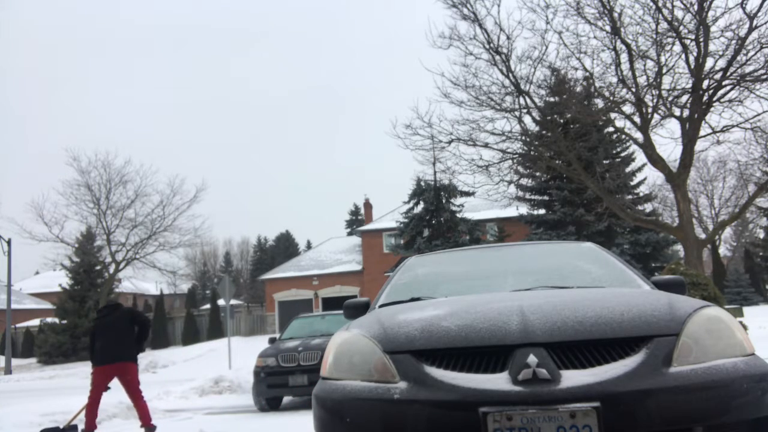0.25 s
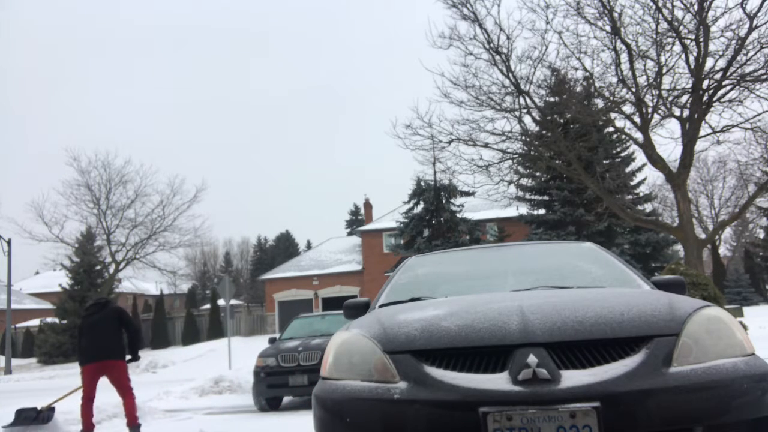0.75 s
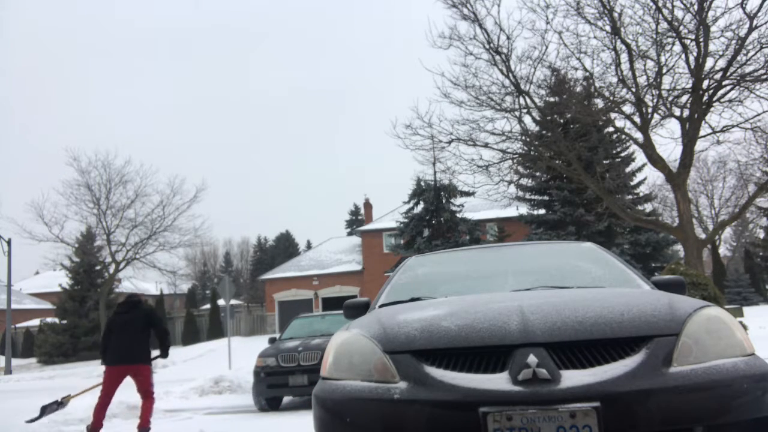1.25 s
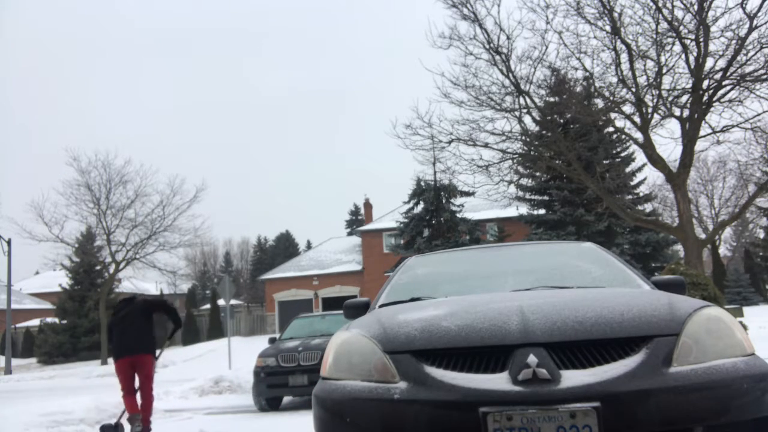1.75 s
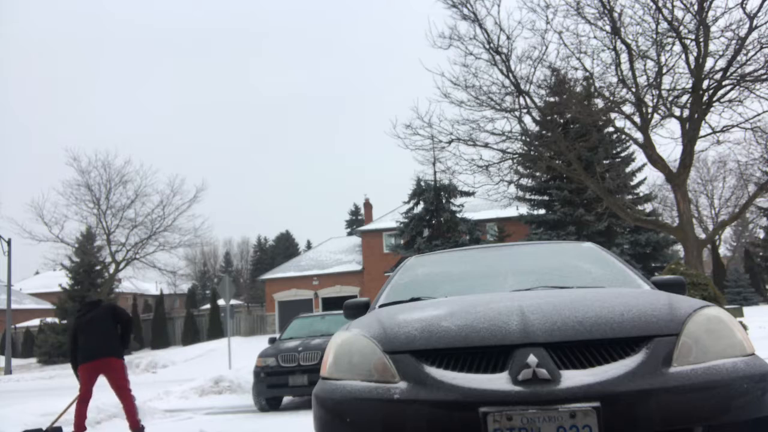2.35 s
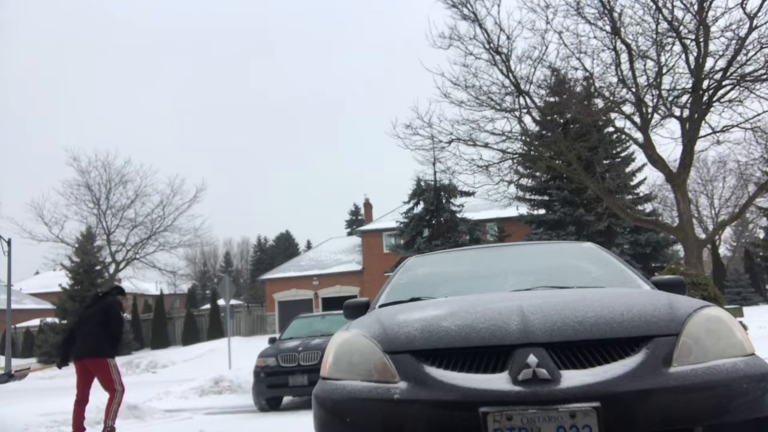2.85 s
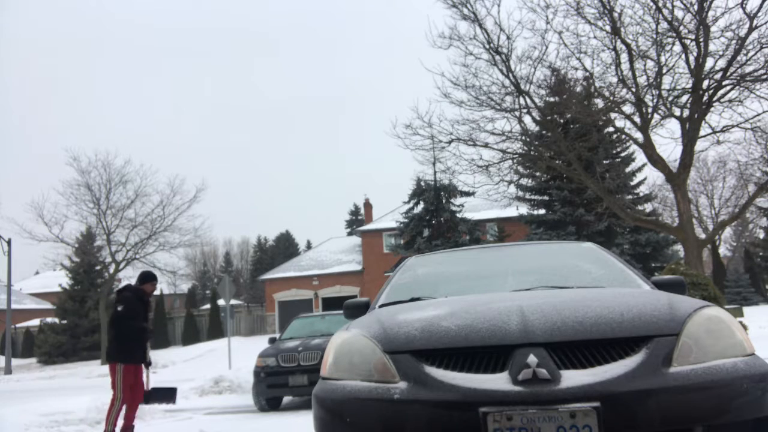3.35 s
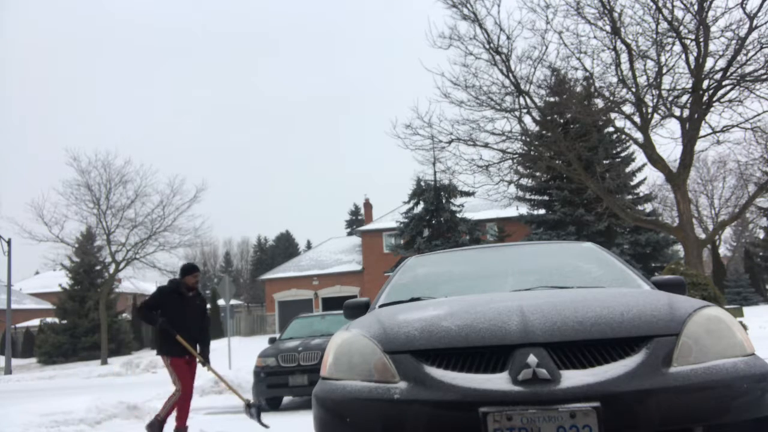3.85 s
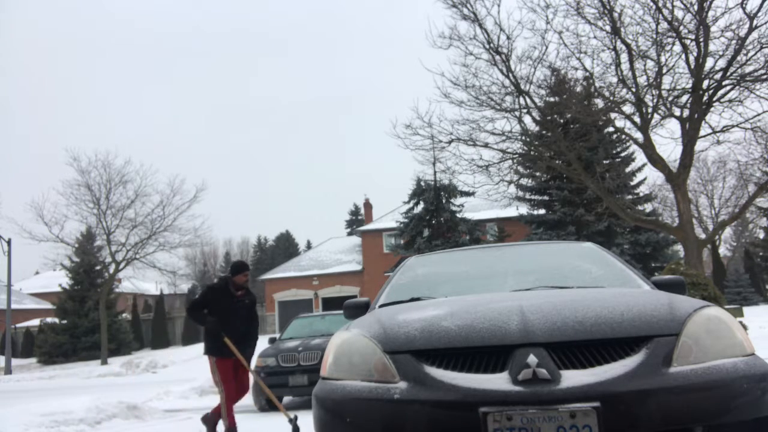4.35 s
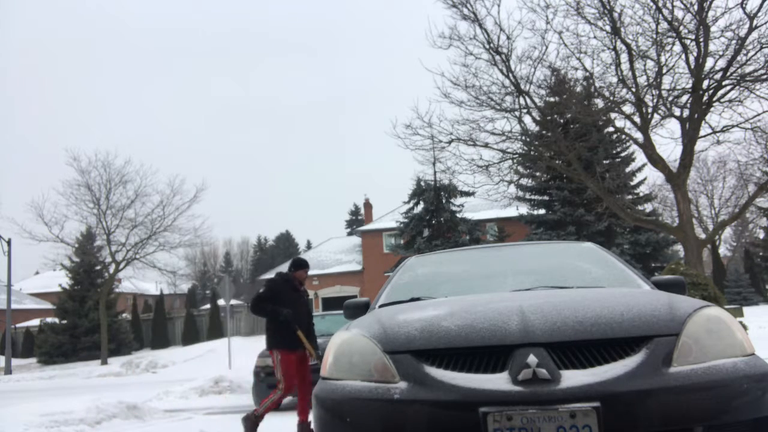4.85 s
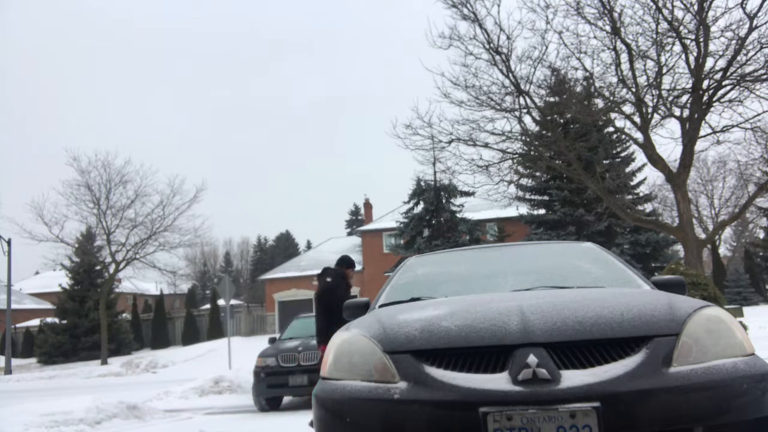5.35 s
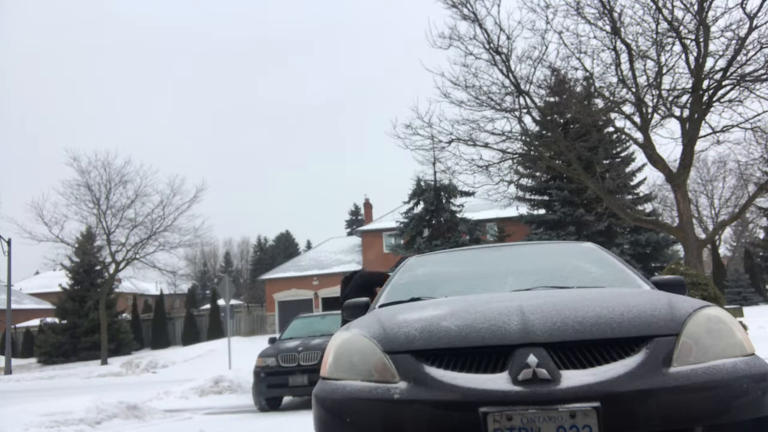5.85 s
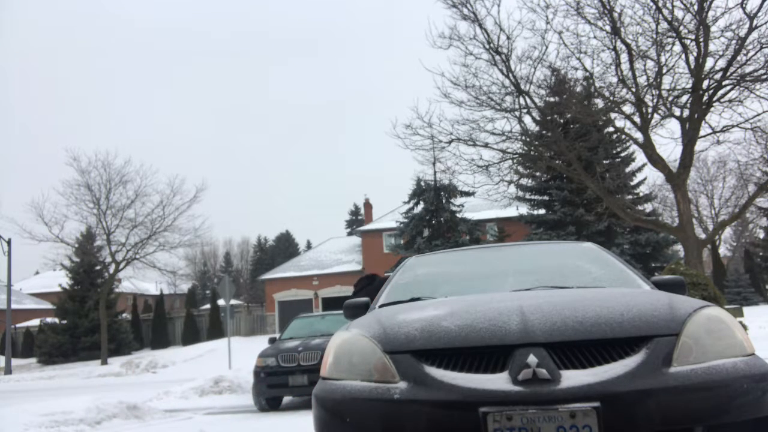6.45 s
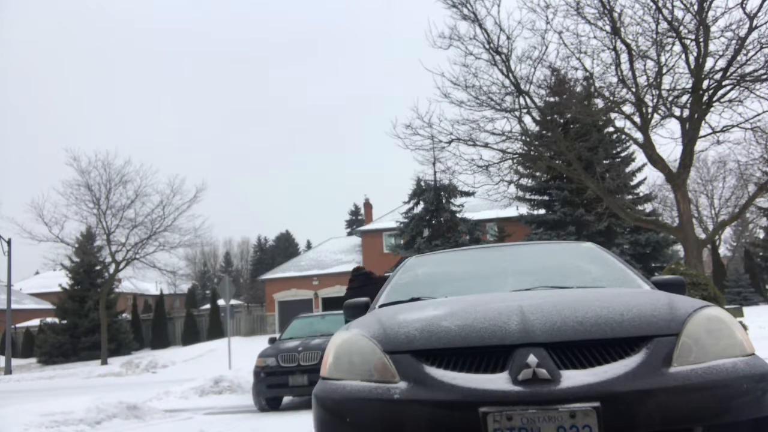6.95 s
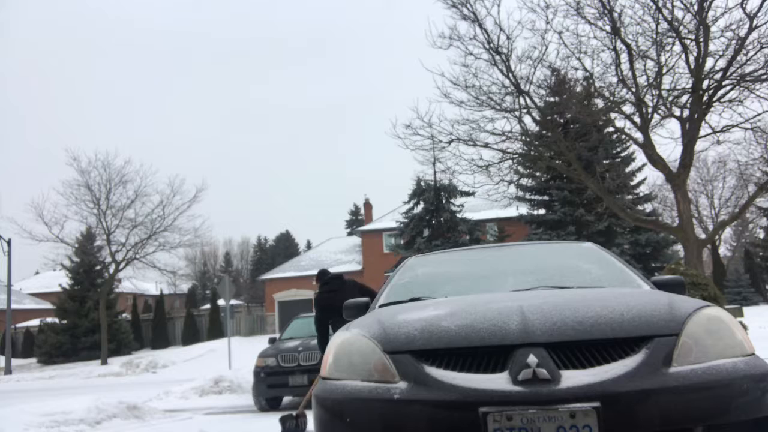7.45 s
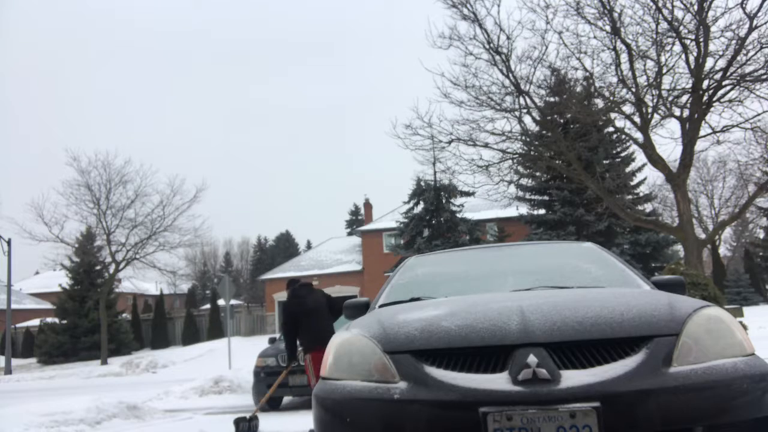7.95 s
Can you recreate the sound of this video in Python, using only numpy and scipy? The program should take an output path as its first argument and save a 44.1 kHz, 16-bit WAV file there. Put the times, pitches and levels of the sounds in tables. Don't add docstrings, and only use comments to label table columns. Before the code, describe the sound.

Someone shovels icy snow outdoors: a short scrape and woody knock, a second push and knock, then longer crunching drags with uneven catches.

```python
import sys
import numpy as np
from scipy import signal
from scipy.fft import rfft, irfft, next_fast_len
from scipy.io import wavfile
from scipy.ndimage import uniform_filter1d

SR = 44100
rng = np.random.default_rng(int(sys.argv[2]) if len(sys.argv) > 2 else 0)


def gain_from_decibels(decibels):
    exponent = np.asarray(decibels, float) / 20
    return 10 ** exponent


def generate_wav(signal):
    frames = np.transpose(np.atleast_2d(signal))
    scaled = np.clip(frames, -1, 1) * 32767
    pcm = np.round(scaled).astype(np.int16)
    wavfile.write(sys.argv[1], SR, pcm)


N = 362502


def read(points, hz):
    f, value = np.transpose(points)
    return np.interp(np.log(hz + 1), np.log(f + 1), value)


def evened(x):
    return x / np.sqrt(np.mean(x ** 2) + 1e-20)


def add(mix, s, sound):
    part = mix[max(round(s * SR), 0):][:len(sound)]
    part += sound[:len(part)]


def lifted(hz, modes):
    return gain_from_decibels(sum(db / (1 + (2 * (hz - f) / max(width, 65)) ** 2) for f, width, db in modes))


def band(x, centre_hz, octaves, modes=()):
    size = next_fast_len(len(x) + 2048)
    hz = np.fft.rfftfreq(size, 1 / SR)
    bell = np.exp(-.5 * (np.log2((hz + 1) / centre_hz) / octaves) ** 2)
    shaped = irfft(rfft(x, size) * bell * lifted(hz, modes), size)
    return evened(shaped[:len(x)])


def grit(size, spread_db, bumps_db, bump_ms):
    cracks = (rng.random(size) < 11000 / SR) * rng.standard_normal(size)
    cracks = cracks * gain_from_decibels(spread_db * np.minimum(rng.exponential(1, size), 4))
    hold = np.exp(-1000 / (bump_ms * SR))
    hits = (rng.random(size) < 110 / SR) * rng.exponential(1, size)
    bumps = signal.lfilter([1], [1, -hold], hits)
    return cracks * gain_from_decibels(bumps_db * uniform_filter1d(evened(bumps - bumps.mean()), 60))


def wandering(x, depth_db):
    z = signal.stft(x, nperseg=512, noverlap=384)[2]
    patches = uniform_filter1d(rng.standard_normal(z.shape), size=2, axis=0)
    patches = uniform_filter1d(patches, size=12, axis=1)
    return signal.istft(z * gain_from_decibels(depth_db * evened(patches)), nperseg=512, noverlap=384)[1][:len(x)]


def curve(rows):
    s, db = np.transpose(rows)
    t = np.arange(s[0], s[-1], 1 / SR)
    return t, np.interp(t, s, db)


def arch(s, rise_s, fall_s, db, lead=1.4):
    t = np.arange(-lead * rise_s, 1.4 * fall_s, 1 / SR)
    return s + t, db - 20 * (t / np.where(t < 0, rise_s, fall_s)) ** 2


def soft_ends(t):
    return np.clip(np.minimum(t - t[0] + (t[0] == 0), t[-1] - t) / 0.00078, 0, 1)


# frequency in Hz, density in dB per Hz.
STREET_SPECTRUM = [(15, -55), (25, 0.5), (80, -7.5), (240, -12.5), (370, -19.5), (700, -25), (2700, -38),
                   (15600, -48.5)]


def street():
    frames, hz = N // 512 + 5, np.fft.rfftfreq(2048, 1 / SR)
    real, imag, patches = rng.standard_normal((frames, 1025, 3)).T
    patches = evened(uniform_filter1d(uniform_filter1d(patches, 20, 0), 10, 1))
    z = (real + 1j * imag) * gain_from_decibels(read(STREET_SPECTRUM, hz)[:, None] + 1.1 * patches)
    return gain_from_decibels(-56.5) * evened(signal.istft(z, nperseg=2048, noverlap=1536)[1][:N])


# delay in ms, level in dB.
ECHOES = [(14, -18.5), (42, -28.5), (68, -34.5), (84, -28.5)]
# frequency in Hz, t60 in seconds.
YARD_DECAY = [(150, 0.9), (400, 0.45), (1000, 0.52), (2500, 0.25), (8000, 0.4)]


def yard(x):
    taps = np.zeros(SR // 2)
    at = np.arange(400, len(taps) - 20, 20)
    taps[at + rng.integers(0, 20, len(at))] = rng.choice([-1., 1.], len(at))
    hz, t, z = signal.stft(taps, SR, nperseg=256)
    tail = signal.istft(z * gain_from_decibels(-60 * t / read(YARD_DECAY, hz)[:, None]), SR, nperseg=256)[1]
    tail = gain_from_decibels(-13) * tail / np.linalg.norm(tail)
    for ms, db in ECHOES:
        smear = rng.standard_normal(300) * np.hanning(300) / 11
        add(tail, ms / 1000, gain_from_decibels(db) * smear)
    return signal.oaconvolve(x, tail)[:N]


# start in seconds, peak in dB, pitch in Hz.
TICKS = [(0.131, -46, 3200), (.7003, -52, 1540), (0.919, -55, 4500), (2.468, -39, 2240), (2.494, -46, 1640),
         (2.524, -48, 1870), (2.578, -43, 2420), (2.72, -54, 5000), (2.6658, -48, 1570), (3.689, -53, 2510),
         (3.8272, -54, 1610)]


def tick(s, db, hz):
    t = np.arange(900) / SR
    snap = band(rng.standard_normal(len(t)), 1.1 * hz, 0.73)
    return s, gain_from_decibels(db - 7.5) * snap * gain_from_decibels(-60 * t / 0.028) * np.clip(t / 0.0012, 0, 1)


# densest moment, rise and fall in seconds, rustle in dB.
SWISHES = [
    (.075, 0.018, 0.023, -54),
    (.114, 0.043, 0.083, -74.5),
    (.72, .22, 0.19, -71.5),
    (1.18, .13, 0.071, -62),
    (1.001, .6, 0.49, -75),
    (2.414, 0.032, 0.03, -49.5),
    (2.529, .15, 0.17, -69.5),
    (2.68, .16, .16, -70),
    (2.945, .1, 0.073, -61),
    (3.69, 0.16, 0.18, -65),
]
# lower edge in Hz, then low shuffle, fizz and bounce off the car body in dB.
SWISH_COLOUR = [(590, -3, -12, -28), (590, 20.5, -7, -14), (550, 2.5, 3.5, -36), (1800, 2, -7, -34),
                (600, 9.5, -5, -25), (770, 3, -8, -27), (770, 12, -8, -28), (770, 0, 1, -28),
                (1000, -10, -4.5, -25), (1100, -3, -13, -5)]


def swish(row, colour):
    t, rustle_db = arch(*row)
    edge_hz, low_db, fizz_db, bounce_db = colour
    drive = wandering(grit(len(t), spread_db=-1.5, bumps_db=-0.6, bump_ms=12), depth_db=1.5)
    drive = drive + gain_from_decibels(bounce_db) * np.roll(drive, round(.894 * SR / 1000))
    rustle = signal.sosfilt(signal.butter(4, edge_hz, "high", fs=SR, output="sos"), drive)
    fizz_db = fizz_db + rustle_db - row[-1]
    cloud = band(rustle, 3050, 0.69) + gain_from_decibels(low_db) * band(drive, 790, 0.84)
    cloud = cloud + gain_from_decibels(fizz_db) * band(drive, 11600, 0.67)
    return t[0], gain_from_decibels(rustle_db) * cloud * soft_ends(t)


# start in seconds, peak in dB.
KNOCKS = [
    [(.0782, -13.5), (.0885, -26)],
    [(2.4038, -16)],
    [(.106, -36), (1.162, -44.5), (1.2, -45), (1.215, -46.5), (2.445, -41), (2.47, -37.5), (2.583, -37.5),
     (5.372, -51), (5.43, -45), (5.829, -42)],
    [(4.7, -41.5), (2.3, -50)],
]
# frequency in Hz, level in dB, t60 in seconds.
KNOCK_MODES = [
    [(160, 1, 0.064), (250, 9, 0.033), (312, 14, 0.017), (744, 3, 0.014), (875, 0.5, 0.02),
     (1143, -6.5, 0.032)],
    [(157, 0, 0.037), (388, 8, 0.026), (496, -9.5, 0.078), (628, -4.5, 0.029), (711, -6, 0.037),
     (818, -11, 0.16), (1090, -16, 0.026)],
    [(253, -1.5, 0.031), (472, 10.5, 0.0057), (720, -10, 0.12)],
    [(105, -3, .09), (147, -7, 0.17)],
]
BLOW_MS = [.16, .17, .4, .9]


def knock(s, db, modes, blow_ms):
    t = np.arange(6000) / SR
    ring = np.zeros(len(t))
    for hz, level_db, t60 in modes:
        build_up = 1 - np.exp(-1.6 * hz * t)
        ring += gain_from_decibels(level_db - 60 * t / min(t60, .055)) * build_up * np.sin(2 * np.pi * hz * t)
    u = np.arange(-4, 8, 1000 / (blow_ms * SR))
    push = np.exp(-.5 * (u - 3) ** 2) - 0.26 * np.exp(-.5 * u ** 2)
    ring = np.diff(signal.oaconvolve(ring, push)[:len(t)], prepend=0)
    return s - .005 * blow_ms, gain_from_decibels(db) * ring / abs(ring).max()


# frequency in Hz, width in Hz, lift in dB.
HUM = [(260, 65, 2), (335, 65, 7), (385, 65, 6)]
# start in seconds, peak in dB, pitch in Hz,
# low thump and spray in dB relative to the burst.
CATCHES = [(1.834, -37, 600, -13, 1.5), (1.965, -33, 1460, -31, -2), (2.028, -38, 1080, -19, -16),
           (2.105, -27, 1300, -31, -18), (4.497, -41, 1930, -23, -20), (4.748, -38, 744, -21, 0),
           (5.247, -34, 1000, -30, -24), (5.328, -39, 1100, 0, -15), (5.36, -35.5, 1100, -0.5, -8),
           (5.825, -43.5, 1660, 7, -22), (6.08, -39.5, 760, 2, -23), (6.324, -34.5, 1100, -2, -30),
           (6.379, -35, 1030, -6, -28), (7.272, -54, 1300, -23, -12), (7.377, -40, 3600, -23, 2),
           (7.385, -32.5, 1950, 0, -23), (7.437, -36, 1210, -2, -2), (7.495, -33, 1500, -23, -6),
           (7.557, -31, 1280, -14, -3), (7.692, -30, 1290, -11, -8), (7.834, -38, 1800, -20, -19),
           (7.912, -35.5, 2570, -18, -16), (8.029, -33, 1790, -33, -11), (8.086, -38, 2700, -13, -11)]


def catch(s, db, hz, thump_db, spray_db):
    t = np.arange(2600) / SR
    noise = rng.standard_normal(len(t))
    burst = band(noise, hz, 0.87)
    burst = burst + gain_from_decibels(thump_db + 3) * band(noise, 310, 0.45, HUM)
    burst = burst + gain_from_decibels(spray_db - 0.5) * band(noise, 3300, 0.68)
    burst = burst + gain_from_decibels(spray_db - 11.0) * band(noise, 14000, 0.28)
    return s, gain_from_decibels(db - 11.5) * burst * gain_from_decibels(-60 * t / 0.12) * np.clip(t / 0.0016, 0, 1)


# frequency in Hz, width in Hz, lift in dB.
BLADE = [
    [(835, 89, 8), (1130, 100, 1), (1500, 57, 13)],
    [(507, 72, 7.5), (1080, 70, 9.5), (1460, 36, 6.5), (2220, 310, 5)],
    [(1180, 130, 5), (1960, 130, 8), (2690, 130, 0)],
    [(750, 61, 4.5), (1062, 71, 7), (1480, 50, 4.5), (1710, 190, 7), (2200, 150, 3)],
    [(705, 160, 5.5), (1080, 82, 6), (1640, 150, 7.5)],
    [(774, 71, 6), (1050, 100, 6.5), (1540, 67, 8)],
    [(780, 21, 6.5), (1120, 30, 6), (1460, 48, 8.5), (1960, 180, 5.5), (3880, 950, 3.5)],
]
# time in seconds, grind in dB.
PUSHES = [
    [(0.0, -50), (0.012, -45), (0.07, -46.5)],
    [(1.832, -66), (1.84, -41), (1.872, -48.5), (1.89, -43.5), (2.094, -39), (2.102, -42), (2.138, -40.5),
     (2.396, -48.5)],
    [(7.222, -53.5), (7.316, -44.5), (7.402, -43.5), (7.48, -49), (7.498, -44), (7.766, -49), (7.79, -49),
     (8.188, -48.5), (8.22, -49)],
]
# time in seconds, grind in dB.
DRAGS = [
    [(4.495, -58), (4.503, -49.5), (4.897, -45), (4.923, -47.5), (5.027, -43.5), (5.187, -50.5), (5.2, -45)],
    [(5.2, -46.5), (5.294, -51.5), (5.372, -50.5), (5.536, -60), (5.542, -55), (5.764, -62.5), (5.8, -53)],
    [(5.8, -56), (5.816, -56), (5.824, -52.5), (5.964, -47.5), (6.242, -58.5), (6.25, -49)],
    [(6.25, -49), (6.32, -51), (6.326, -50), (6.344, -52), (6.378, -50), (6.464, -50), (6.582, -45),
     (6.736, -49), (6.95, -74)],
]
# hardest moment, lead-in and fall in seconds, grind in dB.
SKIPS = [
    (4.425, 0.064, 0.051, -48.5),
    (7.154, .022, .015, -45),
    (7.188, .014, .025, -47.5),
]
# time in seconds, screen in dB, load in dB.
SHOVEL = [(0, 9, -7), (1.83, -2.5, -25), (2.25, -0.5, -11.5), (2.39, 3, -12), (4.36, 1.5, -22),
          (4.85, 3, -11.5), (5.0, 11.5, -11.5), (5.3, 13.5, -14), (5.42, 9.5, -4), (5.8, 15.5, -6),
          (5.97, 11, -5.5), (6.15, 25, -1.5), (6.4, 9.5, -8.5), (6.6, 7, -12.5), (6.85, 2.5, -8),
          (7.25, 5, -13), (7.4, 3, -9), (7.65, -4, -17.5), (8.22, -1.5, -13)]


def stroke(t, grind_db, modes):
    s, screen_db, load_db = np.transpose(SHOVEL)
    screen_db = np.interp(t, s, screen_db)
    extra_db = grind_db + 48
    hum_db = np.interp(t, s, load_db) - 0.36 * extra_db
    edge_db = -5 - 0.37 * screen_db - 0.15 * extra_db
    fizz_db = -10 - screen_db - 0.15 * extra_db
    bite_db = -12 - 0.5 * screen_db - 0.56 * (hum_db + 20)
    drive = wandering(grit(len(t), spread_db=1.3, bumps_db=1.0, bump_ms=9), depth_db=2.2)
    blade = band(drive, 993, 0.81, modes)
    blade = blade + gain_from_decibels(hum_db) * band(drive, 330, .4, HUM)
    blade = blade + gain_from_decibels(bite_db) * band(drive, 2050, 0.41, modes)
    spray = gain_from_decibels(edge_db) * band(drive, 3880, 0.63, modes) + gain_from_decibels(fizz_db) * band(drive, 11900, 0.41)
    return t[0], gain_from_decibels(grind_db - 2.0) * (blade + spray) * soft_ends(t)


def scene():
    scrape, blows = np.zeros((2, N))
    for row in TICKS:
        add(scrape, *tick(*row))
    for row, colour in zip(SWISHES, SWISH_COLOUR):
        add(scrape, *swish(row, colour))
    for rows, modes, blow_ms in zip(KNOCKS, KNOCK_MODES, BLOW_MS):
        for row in rows:
            add(blows, *knock(*row, modes, blow_ms))
    for row in CATCHES:
        add(scrape, *catch(*row))
    opening, second, touch, long, short, back, last = BLADE
    for rows, modes in zip(PUSHES + DRAGS, [opening, second, last, long, long, short, back]):
        add(scrape, *stroke(*curve(rows), modes))
    sets_in = 0.56
    for (s, lead_s, fall_s, db), modes in zip(SKIPS, [touch, touch, last]):
        add(scrape, *stroke(*arch(s, lead_s / sets_in, fall_s, db, sets_in), modes))
    return (scrape + blows + yard(blows + gain_from_decibels(3.0) * scrape) + street())[None]


def band_limit(x):
    return signal.sosfilt(signal.butter(12, 15760, fs=SR, output="sos"), x)


# frequency in Hz, width in Hz, gain in dB.
MIC_DIPS = [(4790, 270, 0), (4900, 180, -7.5), (7600, 1840, -3.5), (10450, 590, -5.5)]


def record(dry):
    hz = np.fft.rfftfreq(N, 1 / SR)
    bass_cut = 1 / np.sqrt(1 + (41 / (hz + 1)) ** 12)
    colour = lifted(hz, MIC_DIPS) * (hz < 15770) * bass_cut
    return band_limit(irfft(rfft(dry) * colour, N))


dry = scene()
out = record(dry)
generate_wav(out)
```